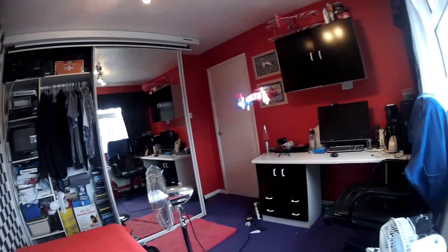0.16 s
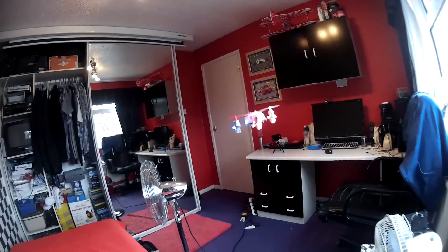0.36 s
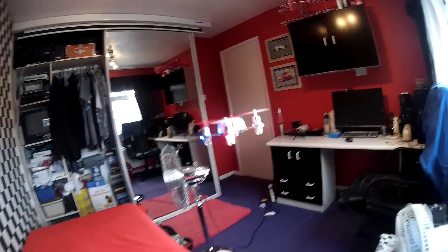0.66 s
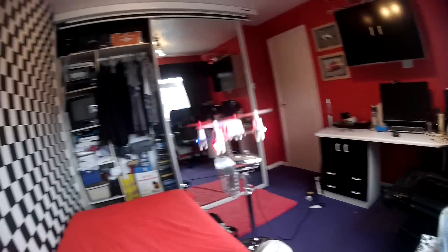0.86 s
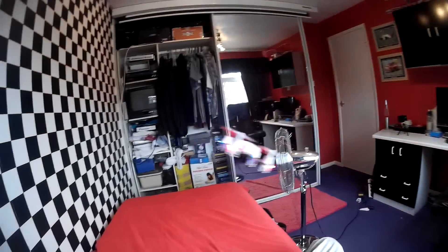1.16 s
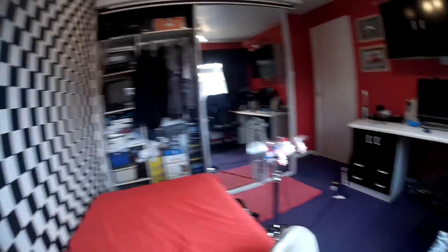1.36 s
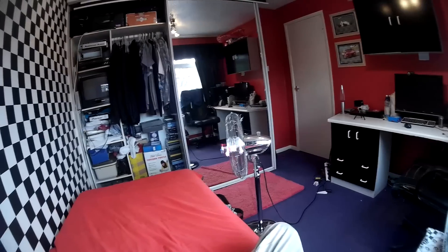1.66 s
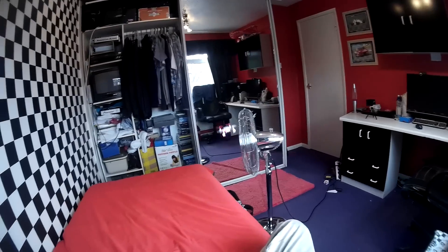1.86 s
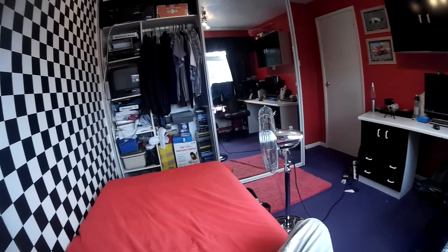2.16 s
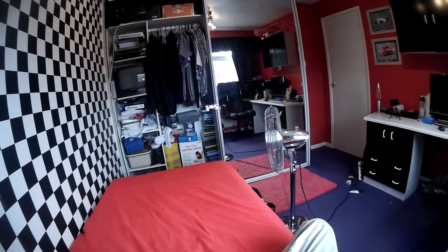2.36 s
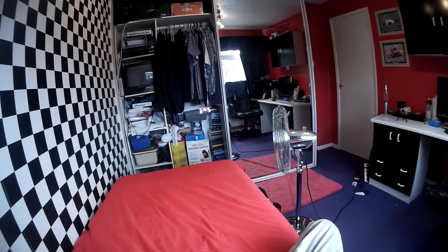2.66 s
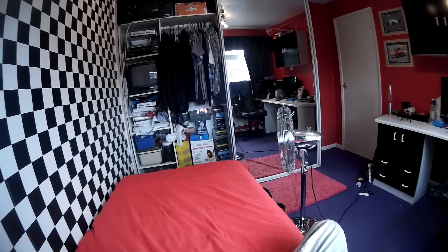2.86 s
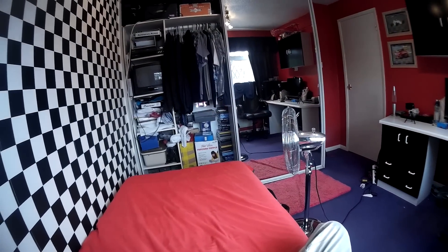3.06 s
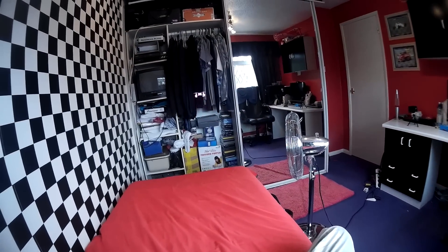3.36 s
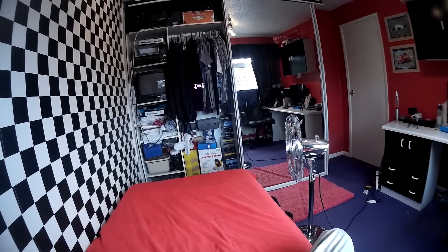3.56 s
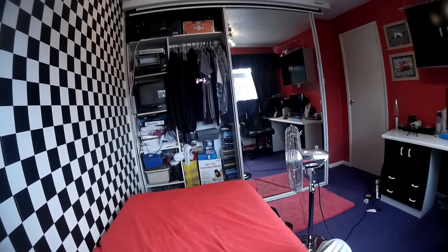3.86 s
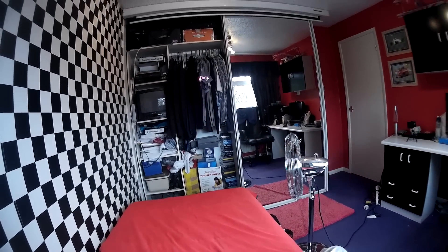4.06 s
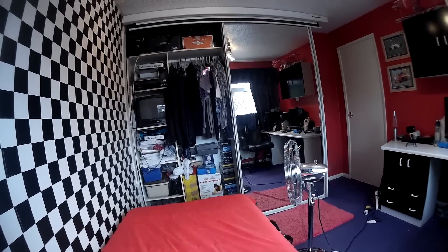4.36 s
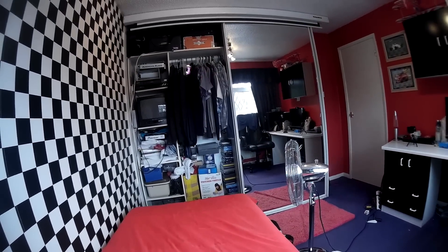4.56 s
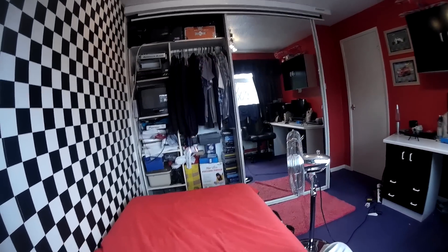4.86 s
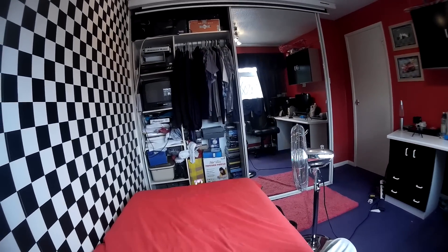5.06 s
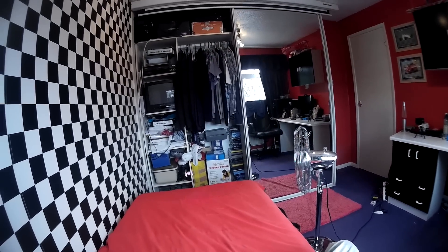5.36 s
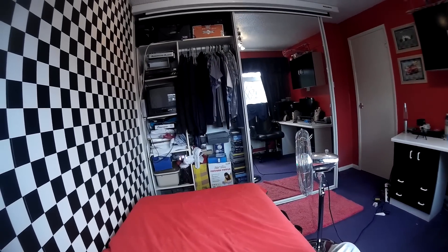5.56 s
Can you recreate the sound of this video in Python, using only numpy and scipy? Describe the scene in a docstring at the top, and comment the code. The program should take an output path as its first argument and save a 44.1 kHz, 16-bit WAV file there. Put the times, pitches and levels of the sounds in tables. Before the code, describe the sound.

High, wavering whine of small drone rotors with airy hiss indoors, two light knocks, a quieter distant stretch, then a harsh rising burst dying away.

```python
"""A tiny four-rotor craft flies about a furnished bedroom, with the microphone in the room.
It starts close by, its rotors rocking in pitch from 1.1 s as the swings widen; two light knocks follow
at 1.8 and 2.0 s. From 2.4 s it is farther off, near 4.5 s its tones roughen as it comes back, then it fades.
Each two-blade rotor is a wavering stack of sines; the blades' hiss is shaped noise with drifting patches.
Soft air noise, thin hum lines and a wavering drone last throughout; rotors and knocks get a short tail."""
import sys
import numpy as np
from scipy import signal
from scipy.io import wavfile
from scipy.ndimage import uniform_filter1d

SR = 44100
rng = np.random.default_rng(int(sys.argv[2]) if len(sys.argv) > 2 else 0)


def voltage_ratio(level):
    """Linear amplitude factor for a level in decibels (scalar or array-like)."""
    return 10 ** (np.asarray(level, float) / 20)


def persist_wave(psi):
    """Save psi, clipped to +-1, as 16-bit WAV."""
    counts = np.round(np.clip(psi, -1, 1) * 32767).astype(np.int16)
    wavfile.write(sys.argv[1], SR, np.atleast_2d(counts).T)


N = 252469  # length in samples

# broadband noise of all blades, and how far the overtones stand out of it:
# start_s, level_db, lift_db (per octave, pivot 6 kHz), overtones_db (above the hiss)
BLADE_NOISE = [(0.0, -44, -2.5, 16), (0.17, -45, -2.5, 10.5), (0.43, -43, -1, 9), (0.94, -40.5, 0.5, 8),
               (1.28, -40.5, -0.5, 9), (1.32, -43.5, -1, 7.5), (1.35, -40.5, -1, 9.5),
               (1.44, -41.5, 0, 8.5), (1.5, -39.5, -1, 13.5), (1.62, -42.5, -0.5, 13),
               (1.9, -44, -2.5, 12.5), (2.2, -44.5, -0.5, 14.5), (2.37, -58, -2, 13.5),
               (2.5, -57.5, 0, 11.5), (2.79, -56, -1, 12.5), (2.95, -50.5, -1, 14.5), (3.09, -53, 0, 9.5),
               (3.16, -54.5, -1.5, 4.5), (3.5, -58, -1.5, 1), (3.8, -56, -2, 3.5), (4.34, -59.5, -1, 7.5),
               (4.51, -53, -3, 5.5), (4.64, -53.5, -4, 2.5), (4.77, -47, -2.5, 6.5), (4.88, -52.5, -4.5, 5),
               (4.92, -45.5, -4, 16.5), (5.0, -42.5, -2, 13.5), (5.26, -44.5, 0.5, 15), (5.45, -46, -2, 6),
               (5.53, -58.5, -1.5, 6.5), (5.72, -67.5, -1, 7)]


def evened(x):
    """Scales to rms 1."""
    return x / np.sqrt(np.mean(x ** 2) + 1e-20)


def read(points, hz):
    """Reads a table on a log-frequency axis."""
    f, value = np.transpose(points)
    return np.interp(np.log(hz + 1), np.log(f + 1), value)


def curves(rows, step=1):
    """Joins the rows by straight lines, one value every step samples."""
    s, *columns = np.transpose(rows)
    times = np.arange(0, N + 1024, step) / SR
    return [np.interp(times, s, column) for column in columns]


def drift(rate_hz, count=1):
    """Slow complex noise of rms 1, twice low-passed, one value every 64 samples."""
    z = rng.standard_normal((count, N // 64 + 2, 2)) @ [1, 1j]
    r = np.exp(-2 * np.pi * rate_hz * 64 / SR)
    for _ in range(2):
        z = signal.lfilter([1], [1, -r], z)
    return z / np.sqrt(np.mean(abs(z) ** 2))


def noise(field_db):
    """Random short-time spectra under a level field (bins x frames of 256 samples)."""
    z = rng.standard_normal((field_db.shape[1], 513, 2)) @ [1, 1j]
    return signal.istft(z.T * voltage_ratio(field_db), nperseg=1024, noverlap=768)[1][:N]


def air():
    """Still air and distant machinery: steady noise, thin hum lines and one wavering low hum."""
    # colour of the room noise: frequency_hz, density_db (per Hz, relative)
    air_colour = [(15, -13), (27, 2), (40, 2), (70, 7.5), (130, -1), (270, 0.5), (500, -4.5), (1000, -3.5),
                  (2000, -8.5), (2800, -19.5), (5000, -12), (14500, -17)]
    # steady tones: frequency_hz, level_db (rms)
    hum_lines = [(59.2, -81), (107.7, -70), (269.2, -77), (457.6, -82.5)]
    # level of the wavering hum: start_s, level_db (rms)
    drone_level = [(0.0, -67), (0.14, -60.5), (0.3, -77), (0.48, -62.5), (0.64, -68.5), (1.24, -63),
                   (2.9, -67), (3.94, -81), (4.31, -69), (4.46, -90), (4.91, -89), (5.02, -78),
                   (5.39, -67.5), (5.55, -76), (5.72, -67)]
    air_db = -59  # rms

    hz, t = np.fft.rfftfreq(1024, 1 / SR)[:, None], np.arange(N) / SR
    floor = voltage_ratio(air_db) * evened(noise(read(air_colour, hz) + np.zeros(N // 256 + 5)))
    lines = np.zeros(N)
    for f, db in hum_lines:
        if abs(f - 110) > 20:  # the drone covers the region near 110 Hz
            lines += voltage_ratio(db) * np.sin(2 * np.pi * (f * t + rng.random()))
    waver = np.interp(np.arange(N), np.arange(N // 64 + 2) * 64, drift(4.2)[0].real)
    drone_hz = 109 + 3.35 * waver
    drone = np.sin(2 * np.pi * np.cumsum(drone_hz) / SR) * voltage_ratio(curves(drone_level)[0][:N])
    return floor + np.sqrt(2) * (lines + drone)


def knocks():
    """Small hard objects touch: a few short decaying modes with a rise of about 1 ms."""
    # the two knocks: start_s, level_db, low_lift_db (of the modes below 1700 Hz)
    touches = [(1.817, -31, 0.5), (1.953, -40, 7.5)]
    # what rings: frequency_hz, level_db (against the knock), t60_s
    modes = [(263.6, -9.5, 0.035), (485, -23, 0.13), (1027, -9.5, 0.054), (1886, 11, 0.015),
             (1678, 5.5, 0.012)]

    t, out = np.arange(4000) / SR, np.zeros(N)
    rise = 1 - np.exp(-t / 0.00067)
    for start_s, level_db, low_lift_db in touches:
        ring = np.zeros(len(t))
        for hz, mode_db, t60_s in modes:
            decay_db = mode_db + low_lift_db * (hz < 1700) - 60 * t / t60_s
            ring += voltage_ratio(decay_db) * np.sin(2 * np.pi * hz * t)
        out[round(start_s * SR):][:4000] += voltage_ratio(level_db) * ring * rise
    return out


def room(x):
    """Sparse echoes of random sign, one in every 20 samples, each band dying at its own speed."""
    # how long the tail lasts: frequency_hz, t60_s
    tail_t60 = [(300, 0.37), (1500, 0.25), (8000, 0.26)]

    taps = np.zeros(SR // 2)
    at = np.arange(200, SR // 2 - 20, 20)
    taps[at + rng.integers(0, 20, len(at))] = rng.choice([-1., 1.], len(at))
    hz, t, z = signal.stft(taps, SR, nperseg=256)
    decay = voltage_ratio(-60 * t / read(tail_t60, hz)[:, None])
    tail = signal.istft(z * decay, SR, nperseg=256)[1]
    return signal.fftconvolve(x, tail / np.linalg.norm(tail))[:N]


def hiss():
    """Turbulent noise off the blades, in patches that drift over time and pitch, its treble tilt moving."""
    # colour of the hiss at the microphone: frequency_hz, density_db (per Hz, relative)
    hiss_colour = [(200, -17.5), (350, -8), (700, -13.5), (1100, -5.5), (1600, -8), (2200, -3.5),
                   (2900, -20.5), (3600, -9.5), (4300, -13), (4900, 0), (7500, -2), (8700, -1.5),
                   (12000, 0.5), (12300, -8), (13600, -3.5), (14300, -13), (14600, -5.5)]

    level_db, lift_db, _ = curves(BLADE_NOISE, step=256)
    hz = np.fft.rfftfreq(1024, 1 / SR)[:, None]
    patches = rng.standard_normal((len(level_db), 513)).T
    patches = uniform_filter1d(patches, size=10, axis=0)
    patches = evened(uniform_filter1d(patches, size=10, axis=1))
    field_db = read(hiss_colour, hz) + 2.55 * patches
    scale = np.std(noise(field_db))
    tilt_db = lift_db * np.log2(np.maximum(hz, 1500) / 6000)
    return noise(field_db + level_db + tilt_db) / scale


def rocking(lag_s):
    """A brief swing to and fro, each wider than the last, and the gate that opens it."""
    start_s, end_s, ramp_s = 1.1, 1.63, 0.08
    period_s, crest_s, growth_per_s = 0.183, 1.355, 1.75

    t = np.arange(N) / SR
    gate = np.clip(np.minimum(t - start_s, end_s - t) / ramp_s, 0, 1)
    t = t - crest_s
    swing = (1 + growth_per_s * t) * np.cos(2 * np.pi * (t - lag_s) / period_s)
    return gate * swing, gate


def rotor(rows, sway, unbalance_db, trim_db, hiss_db, lift_db, over_db):
    """Shaft orders of one rotor; each order flutters alone, the more so in disturbed air."""
    # how disturbed the air through the blades is: start_s, wake (0-1)
    wake_rows = [(0, .1), (.5, .05), (1.1, .05), (1.3, .12), (1.7, .2), (2.2, .2), (2.5, .05), (4.35, .05),
                 (4.45, .8), (4.9, .9), (5.05, .55), (5.15, .25), (5.4, .3), (5.725, .4)]
    # shaft orders 1 and 3 from unbalanced blades, against the blade tone: frequency_hz, level_db
    shaft_colour = [(520, -15), (650, -17), (750, -20), (810, -18.5), (880, -18), (1700, -18.5),
                    (1950, -12.5), (2150, -25), (2500, -28)]
    # orders 4 and up against the hiss: frequency_hz, level_db
    over_colour = [(2200, -24.5), (2700, -29.5), (3100, -28), (3800, -23.5), (4300, -29), (4900, -21.5),
                   (7600, -21.5), (8800, -29), (10500, -28), (11700, -25), (12400, -34), (15000, -31)]
    odd_db = -19.5  # odd orders from 5 up, between the blade multiples
    rock_db = 2.5  # swell of the blade tone at a unit swing of the rocking
    fade_db, over_fade_db = 2.0, 2.0  # rms of the slow random fading of blade tone and overtones
    over_follow = 0.23  # share of a blade tone's swell that its overtones follow
    rock_blur, over_blur = 0.3, 1.5  # how much rocking and disturbed air blur the overtones

    # smoothed over 20 ms
    blade_hz, tone_db = (uniform_filter1d(c, size=900)[:N] for c in curves(rows))
    speed_share, lag_s = sway
    rock, gate = rocking(lag_s)
    blade_hz = blade_hz * (1 + speed_share * rock)

    # levels run on the coarse step of 64 samples
    tone_db = tone_db[::64]
    fades = np.sqrt(2) * drift(5.8, count=2).real[:, :len(hiss_db)]
    over_db = over_db + trim_db + over_follow * tone_db + over_fade_db * fades[1]
    tone_db = hiss_db + tone_db + rock_db * rock[::64] + fade_db * fades[0]
    even_db = uniform_filter1d(tone_db, size=200)  # the shaft tones hold steadier
    even_db = even_db - 0.17 * (even_db + 52.5)  # they spread all round, so they swell less on a near pass

    coarse, fine = np.arange(N // 64 + 2) * 64, np.arange(N)
    wake = np.clip(curves(wake_rows)[0][:N], 0, 1)
    wobble = np.interp(fine, coarse, drift(18)[0].real)
    shaft_hz = blade_hz / 2 * (1 + (.001 + .015 * wake) * wobble)  # two blades pass in each turn
    turns = np.cumsum(shaft_hz) / SR + rng.random()
    wake = wake[::64]
    blur = np.clip(over_blur * wake + rock_blur * gate[::64], 0, 1)

    out = np.zeros(N)
    for k in range(1, 24):
        hz = k * blade_hz[::64] / 2
        if k == 2:  # the blade tone
            db, rough = tone_db, .12 + .9 * wake
        elif k < 4:
            db = even_db + unbalance_db[k // 2] + read(shaft_colour, hz)
            rough = .25 + .6 * wake
        else:
            tilt_db = lift_db * np.log2(hz / 6000)
            db = hiss_db + over_db + read(over_colour, hz) + tilt_db + odd_db * (k % 2)
            rough = .35 + .045 * k + blur
        rough = np.clip(rough, 0, 1)
        # flutter is faster, so blurs wider, at higher orders
        calm = drift(8 + 2.5 * k)[0][:len(db)]
        gusty = drift(min(22 * k, 160))[0][:len(db)]
        stir = wake if k < 4 else blur
        flutter = np.sqrt(1 - stir) * calm + np.sqrt(stir) * gusty
        swing = voltage_ratio(db) * (np.sqrt(1 - rough ** 2) + rough * flutter)
        re, im = (np.interp(fine, coarse[:len(db)], part) for part in (swing.real, swing.imag))
        angle = (2 * np.pi * (k * turns % 1)).astype(np.float32)
        out += re * np.cos(angle) - im * np.sin(angle)
    return np.sqrt(2) * out


def scene():
    """Rotors and knocks with their room tail, over hiss and air."""
    # one table a rotor: start_s, blade_hz (blade-pass rate before rocking), tone_db (above the hiss)
    rotor_rows = [
        [(0.0, 1426, 2), (0.16, 1368, -2.5), (0.24, 1193, -2), (0.3, 1383, 6), (0.37, 1498, 4.5),
         (0.42, 1400, 0.5), (0.49, 1508, 5.5), (0.6, 1410, 4.5), (0.72, 1368, 1.5), (0.95, 1303, 2),
         (1.1, 1285, -1.5), (1.24, 1291, 4), (1.31, 1302, 1), (1.37, 1316, -1.5), (1.46, 1329, -9),
         (1.54, 1353, -0.5), (1.6, 1335, 0.5), (1.67, 1394, -3), (1.72, 1325, -5.5), (1.77, 1350, 4),
         (1.81, 1429, 5), (1.87, 1329, -14), (2.03, 1464, 3), (2.1, 1374, -11), (2.2, 1368, -13),
         (2.3, 1281, -6), (2.38, 1250, -16), (2.47, 1235, -1), (2.52, 1295, 1.5), (2.72, 1282, 3.5),
         (3.03, 1372, -1.5), (3.15, 1366, -6.5), (3.36, 1305, 2.5), (3.6, 1298, 5), (3.95, 1306, 0.5),
         (4.37, 1298, 2), (4.44, 1450, -1), (4.55, 1426, -10), (4.61, 1540, 5), (4.69, 1503, -5),
         (4.77, 1619, 0), (4.85, 1490, -17), (4.89, 1540, -4), (4.92, 1700, -13), (4.955, 1755, 8),
         (4.99, 1555, -1), (5.07, 1659, -1), (5.11, 1650, 5), (5.15, 1751, 10), (5.22, 1687, -1.5),
         (5.3, 1640, 0.5), (5.37, 1600, 3), (5.46, 1650, 0.5), (5.56, 1296, 2), (5.72, 1207, 7)],
        [(0.0, 1400, -1), (0.08, 1254, -2), (0.17, 1156, -4.5), (0.31, 1406, 2), (0.375, 1325, -4),
         (0.44, 1422, 5.5), (0.5, 1435, 7.5), (0.7, 1334, 1.5), (0.88, 1248, -2.5), (1.04, 1245, 6),
         (1.1, 1294, 9.5), (1.18, 1288, -0.5), (1.25, 1290, 5.5), (1.32, 1291, 5.5), (1.43, 1329, 1),
         (1.55, 1318, -6), (1.71, 1235, -11), (1.77, 1327, -11), (1.9, 1327, -10), (1.98, 1392, -2),
         (2.04, 1286, -2), (2.11, 1347, -2.5), (2.19, 1251, -16), (2.27, 1277, -5.5), (2.4, 1211, -11),
         (2.53, 1266, -10), (2.72, 1270, 3.5), (3.0, 1343, -2), (3.14, 1335, 0.5), (3.36, 1253, 3),
         (3.6, 1257, 0), (3.78, 1241, -1.5), (4.1, 1262, 6.5), (4.38, 1247, -3), (4.44, 1378, 4),
         (4.53, 1290, 0), (4.6, 1449, -4), (4.69, 1326, -0.5), (4.78, 1511, -4), (4.88, 1434, -10),
         (4.91, 1590, 9), (4.94, 1687, 9), (4.99, 1418, 1.5), (5.05, 1520, -10), (5.12, 1609, 8),
         (5.2, 1500, -2), (5.3, 1490, -7), (5.4, 1596, -4), (5.58, 1231, 5), (5.72, 1186, 2)],
        [(0.0, 1014, -21), (0.08, 1037, -15.5), (0.2, 1153, -3), (0.28, 1050, -13.5), (0.37, 1007, -11),
         (0.43, 1134, -11), (0.6, 1140, -10), (0.68, 1173, -3.5), (0.82, 1187, -2.5), (1.03, 1154, -11.5),
         (1.12, 1182, -5), (1.6, 1170, -11.5), (1.77, 1229, -12), (1.82, 1143, 1), (1.88, 1228, -13),
         (1.94, 1214, -3), (2.06, 1241, -17), (2.19, 1211, -6.5), (2.24, 1123, -5.5), (2.48, 1112, -8),
         (2.53, 1180, -5), (2.62, 1165, -6.5), (2.8, 1165, -9), (3.0, 1236, -10), (3.09, 1249, -5.5),
         (3.34, 1195, -5.5), (3.9, 1202, -4), (4.35, 1188, -7), (4.47, 1248, -1), (4.55, 1243, -12),
         (4.64, 1191, -6), (4.72, 1340, -17), (4.8, 1309, -3), (4.99, 1316, -12), (5.16, 1379, -9),
         (5.22, 1508, -17), (5.35, 1542, 1.5), (5.5, 1357, -20), (5.6, 1154, -6), (5.72, 1077, -17)],
        [(0.0, 1030, -14), (0.08, 1089, -11), (0.22, 1200, 0.5), (0.3, 1175, -20), (0.37, 1201, -9),
         (0.41, 1154, -8), (0.45, 1194, -6), (0.53, 1130, -13), (0.63, 1248, 1), (0.77, 1261, -3.5),
         (0.86, 1245, -2), (0.92, 1265, 4.5), (1.1, 1260, -0.5), (1.25, 1204, -8.5), (1.5, 1185, -10),
         (1.64, 1299, -4), (1.76, 1311, -3), (1.81, 1349, -7), (2.0, 1359, -2), (2.08, 1270, -9),
         (2.13, 1308, -10), (2.23, 1253, -3), (2.4, 1213, -5), (2.72, 1241, -5), (2.95, 1301, 5),
         (3.08, 1307, -12), (3.25, 1330, 0), (3.42, 1323, -10), (3.6, 1311, 8.5), (3.97, 1310, 2),
         (4.2, 1318, 4), (4.36, 1321, -1), (4.42, 1365, -3), (4.56, 1343, -3), (4.7, 1475, -9), (4.8, 1414, -5),
         (4.9, 1498, -3), (4.97, 1571, -6), (5.03, 1605, 4), (5.1, 1494, -9.5), (5.22, 1626, 4),
         (5.35, 1573, -1), (5.44, 1583, -0.5), (5.62, 1191, -6), (5.72, 1124, -13)],
    ]
    # two rotors speed up as the other two slow down, one row a rotor: speed_share, crest_lag_s
    rock_swing = [(0.07, 0.002), (0.075, 0.075), (0.045, -0.01), (0.02484, 0.085)]
    # unbalanced blades, one row a rotor: order_1_db, order_3_db
    unbalance = [(2, -2.5), (0.5, -0.5), (6, 4.5), (-1, -2)]
    # each rotor's overtones against the common level, as the craft turns:
    # start_s, rotor_1_db, rotor_2_db, rotor_3_db, rotor_4_db
    over_trim = [(0.0, 1, -1.5, 5.5, -4), (0.2, -1, 6.5, -3.5, -1), (0.6, -6.5, 3.5, -2.5, 1.5),
                 (1.0, -8, 2.5, -2.5, 3.5), (1.4, 2.5, 3, 1, 0), (1.9, -2.5, 3.5, 4.5, -5),
                 (2.4, 3.5, 0, 4, -7), (3.0, 2.5, -6.5, 0.5, -2), (3.5, -2.5, 5.5, -0.5, 5),
                 (4.0, -4, 0.5, 1, -7), (4.3, -2.5, 0, 0, -5), (5.0, 3.5, 2, -3, -3),
                 (5.15, -3, 1, -8, 0.5), (5.3, 1.5, 3, -4, 4), (5.72, -4, 1, 1, -6)]
    room_db = -10  # tail against the direct sound

    count = -(-N // 64)  # coarse steps, rounded up
    blades, trims = ([c[:count] for c in curves(rows, step=64)] for rows in (BLADE_NOISE, over_trim))
    near = knocks()
    for own in zip(rotor_rows, rock_swing, unbalance, trims):
        near = near + rotor(*own, *blades)
    return (near + voltage_ratio(room_db) * room(near) + hiss() + air())[None]


def low_pass(x):
    """Removes everything above the highest recorded frequency."""
    return signal.sosfilt(signal.butter(12, 14600, fs=SR, output="sos"), x)


def record(dry):
    """Takes away the treble above 14.45 kHz with a steep linear-phase filter."""
    edge = signal.firwin(511, 14450, window=("kaiser", 9), fs=SR)[None]
    mix = signal.oaconvolve(dry, edge, "same")
    return low_pass(mix)


dry = scene()
out = record(dry)
persist_wave(out)
```